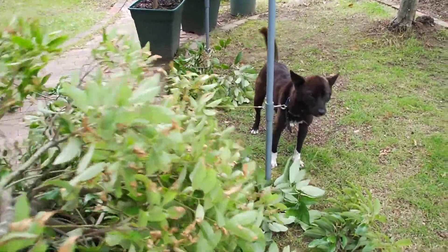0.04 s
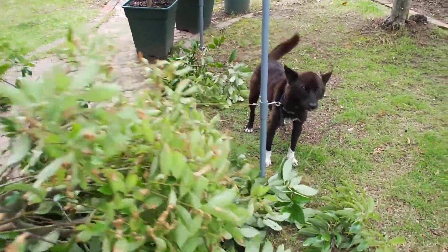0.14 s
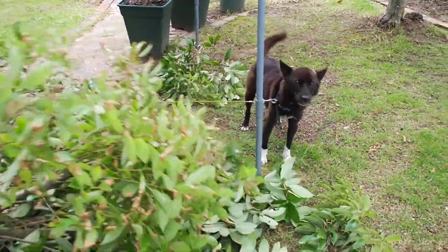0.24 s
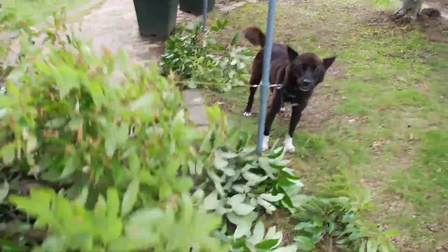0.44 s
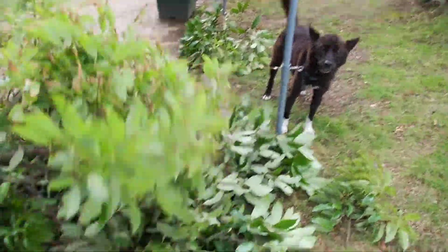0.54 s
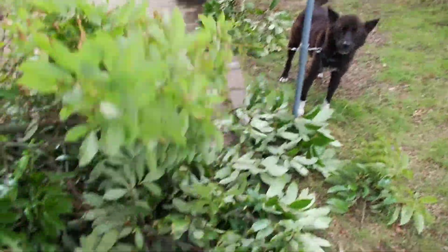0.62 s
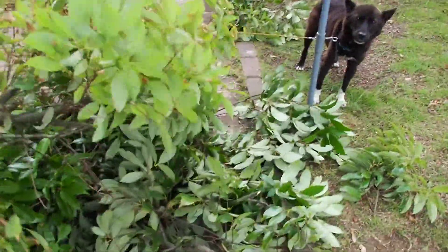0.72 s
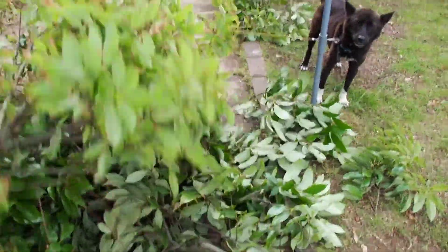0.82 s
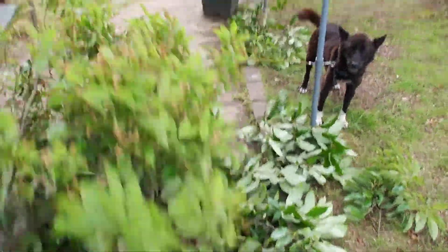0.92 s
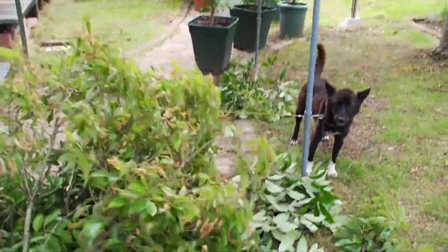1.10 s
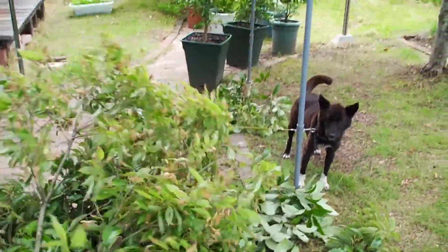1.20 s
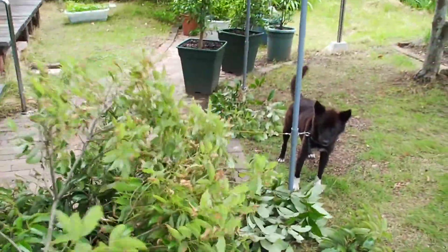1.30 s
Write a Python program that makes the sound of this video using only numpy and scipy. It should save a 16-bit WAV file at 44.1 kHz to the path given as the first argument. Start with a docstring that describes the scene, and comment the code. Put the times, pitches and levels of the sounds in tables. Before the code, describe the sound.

A leafy branch rustles and lands on a pile with a sharp snap.

```python
"""Leafy branch dropped on a pile

A cut branch swings through a garden and lands on a pile of cuttings, close by. Thousands of tiny
leaf contacts make the rustle, with thin shoots tapping inside it. It swells as the foliage meets
the pile: bark scrapes, twigs snap, the stem thuds on the ground and the pile shudders.
Then the leaves settle over a faint outdoor rumble."""
import sys
import numpy as np
from scipy import signal
from scipy.fft import rfft, irfft
from scipy.io import wavfile

SR = 44100
rng = np.random.default_rng(int(sys.argv[2]) if len(sys.argv) > 2 else 0)


def waveform_to_disk(signal):
    """Save audio, clipped to [-1, 1], as 16-bit WAV at the path in sys.argv[1]."""
    frames = np.transpose(np.atleast_2d(signal))
    scaled = np.clip(frames, -1, 1) * 32767
    samples = np.round(scaled).astype(np.int16)
    wavfile.write(sys.argv[1], SR, samples)


N = 59535
TIME = np.arange(N) / SR
HZ = np.fft.rfftfreq(2 * N, 1 / SR)

# rustle building through the swing (time [s], body fader [dB], treble fader [dB])
SWING_FADERS = [(0, -46.5, -50.5), (.075, -42.5, -44.5), (.15, -41, -40.5), (.21, -38, -39),
                (.28, -36.5, -37), (.4, -35, -33.5), (.5, -35.5, -36), (.55, -38, -37), (.6, -36, -36),
                (.7, -37, -36.5), (.8, -35, -37), (.875, -38.3, -37.5), (.91, -32.5, -33),
                (.96, -30, -28.5), (.996, -28, -22)]
# rustle falling away as the leaves settle (time [s], body fader [dB], treble fader [dB])
SETTLE_FADERS = [(1.01, -24, -26), (1.037, -32, -27.5), (1.063, -36.5, -33), (1.11, -41, -37.5),
                 (1.18, -44.5, -42), (1.26, -44, -42), (1.34, -43.5, -42.5)]
# papery tone of the foliage (frequency [Hz], relative level [dB])
LEAF_EQ = [(40, -36), (120, -16.5), (230, -11.5), (340, -8), (560, -8.5), (780, 0.5), (1150, -2),
           (1550, 1.5), (1950, -2.5), (2450, 0.5), (3300, 1), (4500, -1.23), (5050, -7), (6100, -8),
           (7800, -5), (10000, -7), (13000, -9.5), (15600, -12.5)]
# slight sideways drift of the foliage (time [s], left minus right [dB])
FOLIAGE_PAN = [(0, -0.1), (.85, 0), (.99, 0.4), (1.02, -0.2), (1.07, -0.5), (1.2, -.3)]
# twigs that snap or knock (time [s], gain [dB], treble against body [dB], decay [s])
TWIG_SNAPS = [(0.335, -34, -10, .006), (0.397, -23, -12, 0.0071), (.6178, -38, 20, 0.00056),
              (.671, -25, -10, 0.0026), (.725, -33, -13, 0.0057), (0.776, -26, -7, 0.0028),
              (0.902, -26, -3, 0.0025), (0.9913, -27.5, 14, .005), (0.994, -18, -8, 0.0024),
              (1.002, -3, -0.5, .0008), (1.0036, -7, 0, 0.0024), (1.0133, -20, 7, 0.0015)]
# tone of cracking wood (frequency [Hz], relative level [dB])
CRACK_EQ = [(60, -30), (250, -29), (550, -9), (950, 5), (1500, 7.5), (2100, -2), (3500, 6), (5500, -9.5),
            (8000, 5), (10500, 2), (15500, -3.5)]
# the stem bumps on the pile and the ground (time [s], gain [dB], pitch [Hz])
STEM_BUMPS = [(0.895, -30, 256), (1.005, -13.5, 224), (1.0269, -24, 250), (1.036, -33, 150)]
# modes of the stem (multiple of the pitch [ratio], relative level [dB])
STEM_PARTIALS = [(1, 0), (1.6, -5), (4.5, -12)]
# the stem drags through the pile just before it lands (time [s], level [dB])
DRAG_FADER = [(.88, -70), (.925, -39), (.99, -35.5), (1.02, -70)]
# hollow tone of that scrape (frequency [Hz], relative level [dB])
DRAG_EQ = [(300, -25), (600, -14), (800, 1.5), (1050, -2), (1500, -3), (2200, -25)]
# bassy tone of the shuddering pile (frequency [Hz], relative level [dB])
PILE_EQ = [(25, -24), (42, -8), (62, 1), (110, 16.5), (260, -6), (450, -5), (800, -30), (2000, -60)]
# tone of the outdoor background (frequency [Hz], relative level [dB])
AIR_EQ = [(20, -27), (38, -11), (55, -1), (85, 3), (125, -12.5), (230, -3), (450, -13), (1500, -22.5),
          (15000, -25)]
# the outdoor background eases down (time [s], level [dB])
AIR_FADER = [(0, -54.5), (.9, -56.5), (1.3, -60)]
# stereo image, narrow lows and wide highs (frequency [Hz], left-right likeness [ratio, capped at 1])
STEREO_LIKENESS = [(100, 0.95), (700, 0.74), (1400, 2), (2100, 0.57), (4000, 0.26), (6000, 0.0964),
                   (15000, .1)]
# the highs lean to the left (frequency [Hz], left minus right [dB])
STEREO_BALANCE = [(100, -1), (1300, -.5), (2400, -0.5), (4200, 3), (8000, 2), (15000, 1.8)]


def leaves(sprays=60, ring_samples=160, contacts_per_s=30000, ring_s=0.00042):
    """Each spray of leaves ticks in clumps of contacts, with its own very short papery ring."""
    spread_db, clump_db, clump_s = 2, 2.5, 0.016
    body_boost_db, treble_boost_db, flutter_db = 4.5, 9, 0.15
    pair = np.zeros((2, N))
    for _ in range(sprays):
        touches = rng.random(N) < contacts_per_s / sprays / SR
        force = amp(spread_db * np.minimum(rng.exponential(1, N), 4) + clump_db * wander(clump_s))
        ring = rng.standard_normal((2, ring_samples)) * np.exp(-TIME[:ring_samples] / ring_s)
        ticks = touches * force * rng.choice([-1, 1], N)
        pair += signal.oaconvolve(ticks[None], unit(ring), axes=1)[:, :N]
    body, treble = crossover(stereo_eq(unit(pair), LEAF_EQ))
    body_gain, treble_gain = foliage_gains()
    rustle = body * amp(body_boost_db) * body_gain + treble * amp(treble_boost_db) * treble_gain
    return rustle * amp(flutter_db * wander(clump_s))


def shoots(count=36, ring_samples=900, taps_per_s=380, low_hz=776, high_hz=4210):
    """Thin shoots tap each other among the leaves, each ringing for a few cycles at its own pitch."""
    trim_db, spread_db, ring_cycles = -6, 1.5, 2.83
    pair, t = np.zeros((2, N)), TIME[:ring_samples]
    for hz in np.geomspace(low_hz, high_hz, count):
        touches = rng.random(N) < taps_per_s / count / SR
        taps = touches * amp(spread_db * np.minimum(rng.exponential(1, N), 3))
        tone = np.sin(2 * np.pi * (hz * t + rng.random((2, 1))))
        ring = tone * t * np.exp(-2 * t * hz / ring_cycles)
        pair += signal.oaconvolve(taps[None], unit(ring), axes=1)[:, :N]
    body_gain, _ = foliage_gains()
    return amp(trim_db) * unit(stereo_eq(pair, LEAF_EQ)) * body_gain


def twigs(attack_s=0.00011):
    """Each twig snaps or knocks: a woody noise burst of a few milliseconds, with its own brightness."""
    body, treble = crossover(stereo_noise(CRACK_EQ))
    return sum(amp(db) * strike(start, attack_s, decay) * (body + amp(bright_db) * treble)
               for start, db, bright_db, decay in TWIG_SNAPS)


def stem(attack_s=0.0015, decay_s=0.0024, low_cut_hz=97):
    """Wood thuds on soft ground: each bump rings the stem's heavily damped modes."""
    knocks = np.zeros(N)
    for start, db, hz in STEM_BUMPS:
        envelope = 2 * strike(start, attack_s, decay_s)
        for ratio, mode_db in STEM_PARTIALS:
            knocks += amp(db + mode_db) * envelope * np.sin(2 * np.pi * hz * ratio * (TIME - start))
    return signal.sosfilt(signal.butter(2, low_cut_hz, "high", fs=SR, output="sos"), knocks)


def drag():
    """Bark scrapes on the cuttings: a hollow swell of noise leading into the landing."""
    return fader(DRAG_FADER) * stereo_noise(DRAG_EQ)


def pile(landing_s=1.004, gain_db=-40):
    """The pile shudders under the weight: low noise that dies away after the landing."""
    return amp(gain_db) * strike(landing_s, attack_s=0.0081, decay_s=0.037) * stereo_noise(PILE_EQ)


def air():
    """A faint bed of outdoor rumble."""
    return fader(AIR_FADER) * stereo_noise(AIR_EQ)


def amp(db):
    """Decibels to gain."""
    return 10 ** (np.asarray(db) / 20)


def unit(x):
    """Scales to rms 1."""
    return x / np.sqrt(np.mean(x ** 2) + 1e-20)


def fader(points):
    """Gain over time, ramping in dB from point to point."""
    return amp(np.interp(TIME, *np.transpose(points)))


def foliage_gains():
    """Body and treble gains of the foliage through the swing and the settling."""
    points = np.vstack([SWING_FADERS, SETTLE_FADERS])
    return fader(points[:, [0, 1]]), fader(points[:, [0, 2]])


def curve(points):
    """A curve over frequency, its points joined on a log axis."""
    hz, value = np.transpose(points)
    return np.interp(np.log(HZ + 1), np.log(hz), value)


def filtered(x, response):
    """Filters by a frequency response."""
    return irfft(rfft(x, 2 * N) * response)[..., :N]


def wander(step_s):
    """Smooth random modulation of rms 1."""
    return unit(filtered(rng.standard_normal(N), np.exp(-(HZ * step_s) ** 2)))


def strike(start_s, attack_s, decay_s):
    """Envelope of a hit: quick attack, exponential decay."""
    t = np.maximum(TIME - start_s, 0)
    return (1 - np.exp(-t / attack_s)) * np.exp(-t / decay_s)


def crossover(x, split_hz=4410):
    """Splits a sound into body and treble."""
    body = filtered(x, 1 / (1 + (HZ / split_hz) ** 8))
    return body, x - body


def stereo_eq(pair, eq, left_lead_s=0.000095):
    """Colours two signals and narrows their low end; the left leads and is brighter."""
    left, other = rfft(pair, 2 * N) * unit(amp(curve(eq)))
    likeness = np.clip(curve(STEREO_LIKENESS), 0, 1)
    lean = amp(curve(STEREO_BALANCE) / 2)
    delay = np.exp(-2j * np.pi * HZ * left_lead_s)
    right = (likeness * left + np.sqrt(1 - likeness ** 2) * other) * delay
    return irfft([left * lean, right / lean])[:, :N]


def stereo_noise(eq):
    """Steady stereo noise with the given tone."""
    return stereo_eq(rng.standard_normal((2, N)), eq)


def scene():
    """The open-air mix, with no reverb: drifting foliage over the landing and the background."""
    pan = np.sqrt(fader(FOLIAGE_PAN))  # half of the dB to each side
    foliage = (leaves() + shoots() + twigs()) * np.array([pan, 1 / pan])
    return foliage + stem() + pile() + air() + drag()


def record(dry, high_cut_hz=15780):
    """Clips any peak beyond full scale, then cuts the very top end."""
    clipped = np.clip(dry, -1, 1)
    high_cut = signal.firwin(511, high_cut_hz, window=("kaiser", 9), fs=SR)
    return signal.oaconvolve(clipped, high_cut[None], "same")


dry = scene()
out = record(dry)
waveform_to_disk(out)
```